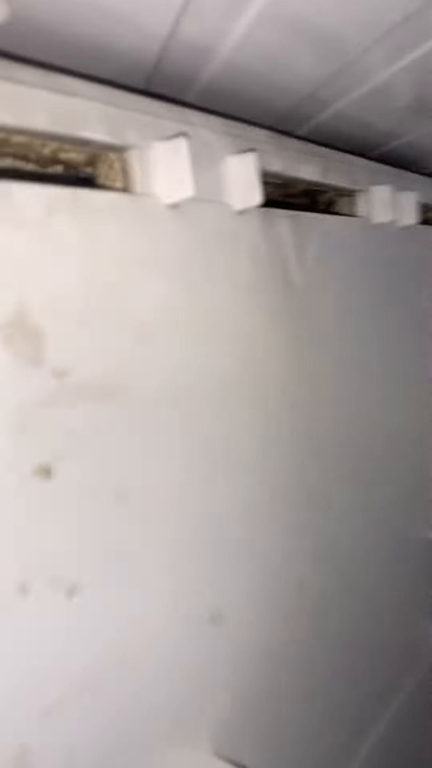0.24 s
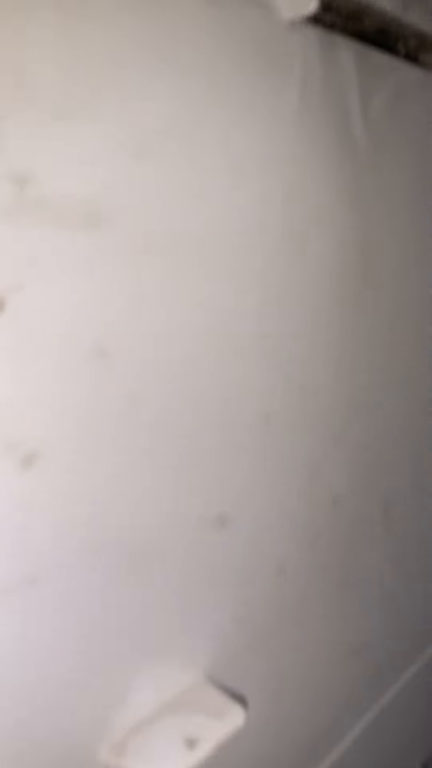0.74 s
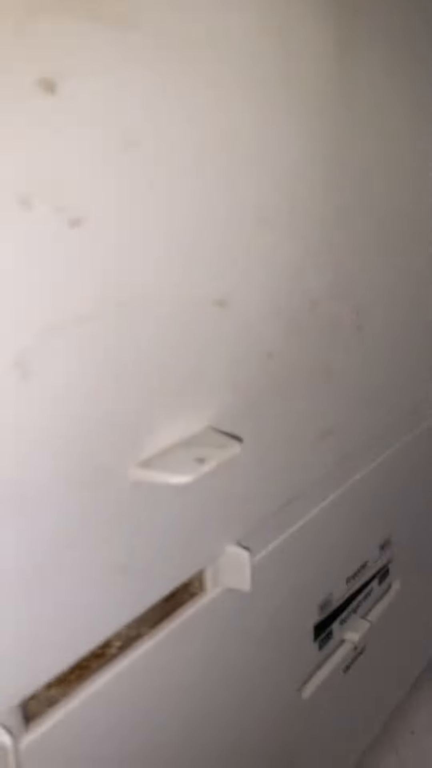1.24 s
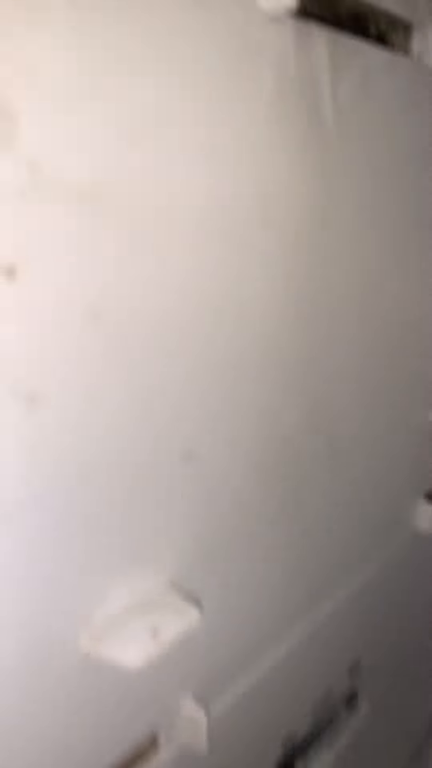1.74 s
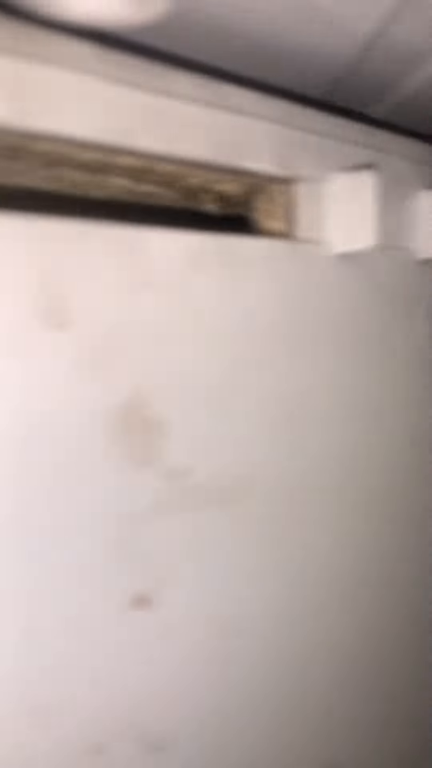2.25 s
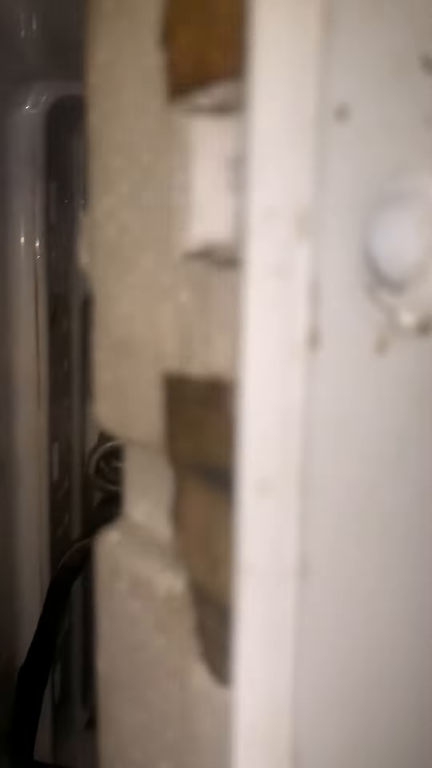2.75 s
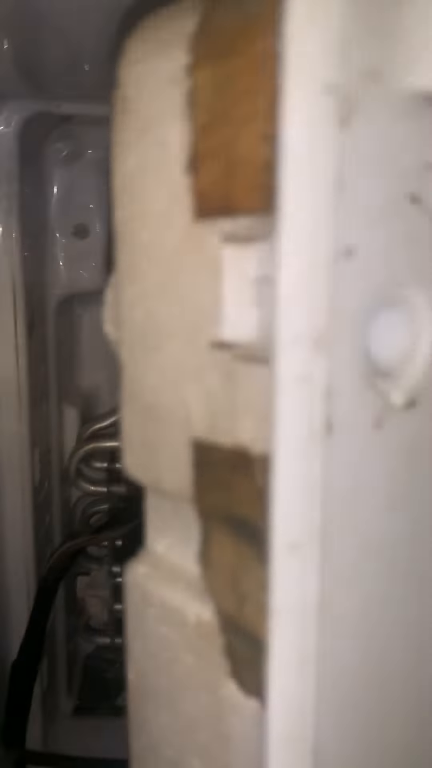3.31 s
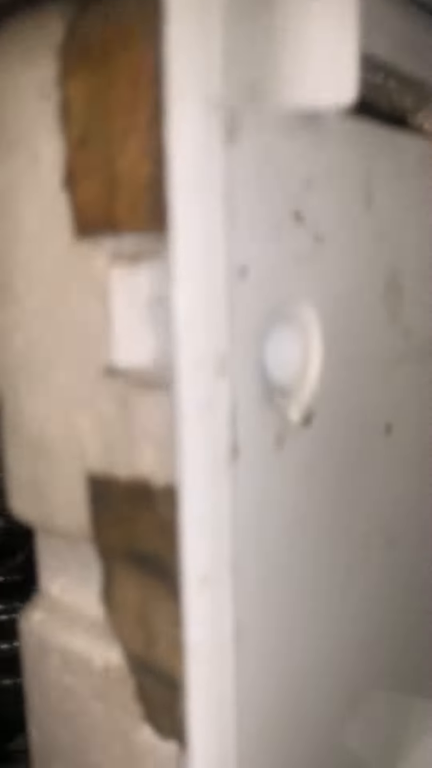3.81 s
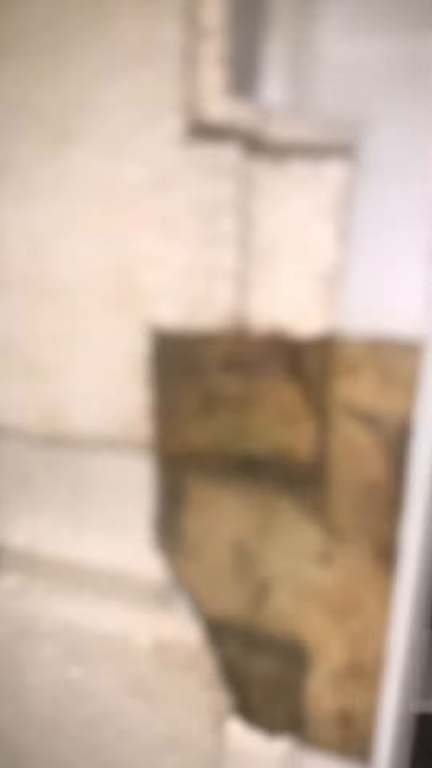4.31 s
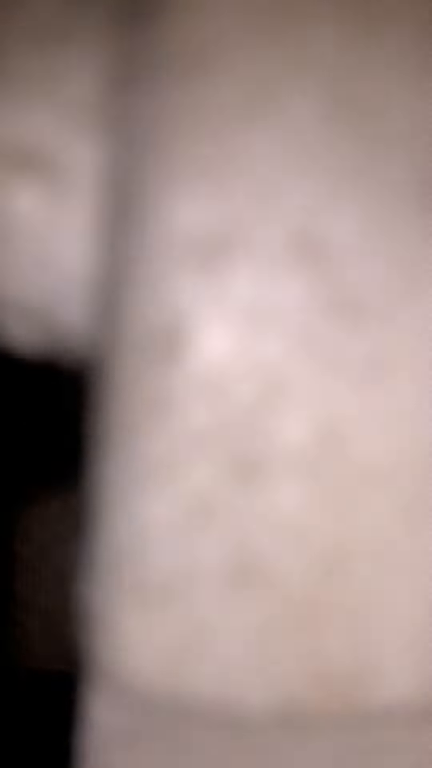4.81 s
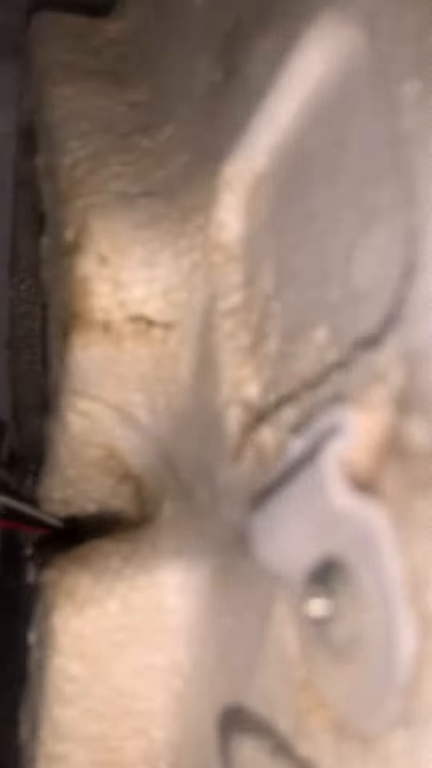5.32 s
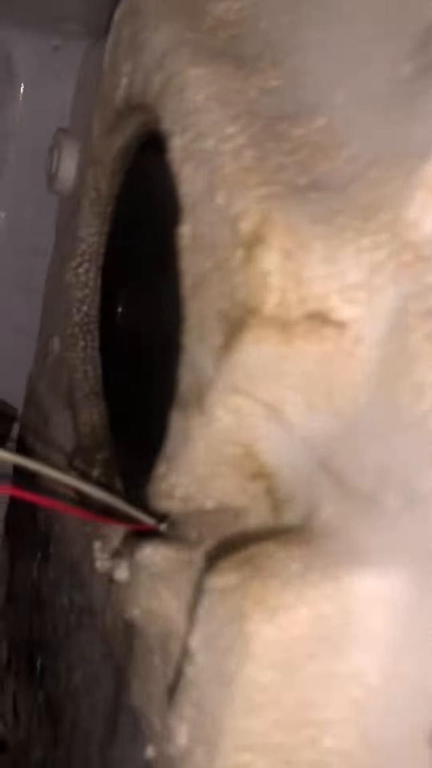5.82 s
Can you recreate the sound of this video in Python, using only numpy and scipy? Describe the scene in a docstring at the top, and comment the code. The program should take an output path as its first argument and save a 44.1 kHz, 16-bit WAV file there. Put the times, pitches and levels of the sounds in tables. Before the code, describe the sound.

Inside a running fridge, low humming and stirred air accompany dull plastic thumps and finger ticks before the fan's drone swells up close.

```python
"""Inside a running refrigerator's freezer

A hand-held phone hears it from the empty compartment: shaft harmonics hum, shaped noise is the stirred air.
Knocks ring modes of the plastic liner; fingers slide and tick on the phone's case, which creaks in the hand.
Near the end the phone moves behind the back panel, up to the fan opening, where the drone is louder."""
import sys
import numpy as np
from scipy import signal
from scipy.fft import rfft, irfft, next_fast_len
from scipy.io import wavfile
from scipy.ndimage import uniform_filter1d, map_coordinates

SR = 44100
rng = np.random.default_rng(int(sys.argv[2]) if len(sys.argv) > 2 else 0)


def log_audio(samples):
    """Write samples as a 16-bit WAV file to the path given in sys.argv[1]."""
    # one column per channel
    frames = np.atleast_2d(samples).T
    # limit to full scale, then quantise
    limited = np.clip(frames, -1, 1)
    pcm = np.round(limited * 32767).astype(np.int16)
    wavfile.write(sys.argv[1], SR, pcm)


N = 267334
T = np.arange(N) / SR

MOTOR_HZ = 55.66  # mean shaft rate
BLADES = 3
# Motor tones. Each row: multiple of the shaft rate (rounded for pitch), level in the compartment in dB,
# left minus right there in dB at the path's strongest lean, right lag there in rad, level at the fan in dB.
MOTOR_TONES = [(1.99, -52, 18, -0.5, -38.5), (2.94, -46, 16.5, 0.5, -49.5), (4.02, -71, 12, -1.5, -61.5),
               (4.94, -53, 20, 2.5, -63), (6.26, -52, 13.5, -1.24, -61.5), (12, -92, -6, 5, -76.5),
               (15.47, -58.5, -16, 1.6, -60), (17.8, -63, 7.5, 1.9, -70.5), (20.7, -66.5, 20, -1, -82),
               (26.8, -72.5, -16, 1.5, -73.5)]
# The phone's path. Each row: time in seconds, gain of the fan's sound in dB,
# left minus right in the standing wave in dB, strength of that wave in dB.
PHONE_PATH = [(0, -14, -1.5, 13), (.4, -58, 8, -3.5), (1, -27, 24, -0.5), (1.5, -29.5, 18.5, 2),
              (2.1, -58, 10.5, -1), (2.45, -34, 8.5, -2.5), (2.8, -37, 26, -1.5), (3.7, -20, 14, -2),
              (4.05, -23, 34, -7.5), (4.25, -18, -3, -14), (4.72, -13, 25, 1.5), (4.85, -0.5, 4, 6),
              (5.1, 0.5, 4, -18), (6.06, 3.5, 15, -3)]
BOOM_REFERENCE_DB = -38.5  # the fan gain that leaves the compartment's boom level unchanged
BOOM_FALL = 0.052  # dB the compartment's boom loses per dB gained by the fan
BOOM_SHADE, RUSH_SHADE = 1, 3.2  # exponents: how steeply the back panel shuts out boom and rush
# Brief level changes shared by rush, draught, gap air, grumble (falls only) and, most fully, upper hum.
# Each row: time in seconds, half length in seconds, change in dB.
LEVEL_CHANGES = [(1.166, 0.029, -4), (3.247, 0.029, -14), (4.14, 0.029, -11.5), (4.197, 0.021, -10.5),
                 (4.238, 0.014, -5), (4.32, 0.017, -0.5), (4.395, .016, 0), (4.47, 0.013, -7),
                 (4.571, 0.013, -3), (4.655, 0.017, 3), (4.68, 0.011, -2.5), (4.7, 0.012, 6),
                 (4.727, 0.011, -4), (4.76, 0.0086, 4), (4.848, 0.0082, 6), (4.859, 0.014, -9),
                 (5.03, 0.016, 2.5), (5.15, 0.014, -3)]

# Draught at the fan opening, common to both microphones. Each row: frequency in Hz, level in dB.
FAN_MID_COLOUR = [(25, -34), (55, -6.5), (85, -3), (108, 3.5), (130, -5.5), (190, -17.5), (290, -19),
                  (350, -16), (530, -23.5), (620, -21), (720, -24.5), (860, -23), (1040, -31.5),
                  (1750, -41), (2500, -47.5), (4000, -51), (4600, -73.5)]
# The same, opposed between the microphones. Each row: frequency in Hz, level in dB.
FAN_SIDE_COLOUR = [(100, -39.5), (350, -38.5), (480, -22.5), (610, -8), (700, 4.5), (850, 15), (980, 16),
                   (1300, 4), (1800, -1), (2300, 0.5), (2600, -3.5), (3600, -12), (4600, -16.5),
                   (7000, -44)]
FAN_MID_DB, FAN_SIDE_DB = -36, -50.5
# Hollow resonances in the fan duct. Each row: frequency in Hz, width in Hz, level in dB.
DUCT_RESONANCES = [(468, 36, -70), (627, 41, -57), (826, 75, -53.5), (1197, 40, -64.5), (1437, 69, -73.5),
                   (1760, 140, -67.5)]
# Resonances of the gap beside the back panel. Each row: frequency in Hz, width in Hz, level in dB.
GAP_RESONANCES = [(396, 31, -60.5), (603, 50, -77), (839, 17, -59), (985, 56, -56.5), (1140, 40, -70.5),
                  (1700, 130, -83)]
GAP_S, GAP_HALF_S = 4.46, 0.41  # when the phone passes the gap, and half the time that takes
# Compartment air, common to both microphones. Each row: frequency in Hz, level in dB.
AIR_MID_COLOUR = [(25, -32), (45, -10.5), (85, -8), (110, 4.5), (135, -1.5), (165, -3.5), (200, -8),
                  (270, -2.5), (305, -12.5), (390, -21), (670, -33), (790, -20.5), (1150, -15.5),
                  (1350, -20.5), (1680, -22), (2150, -28), (2600, -35), (3900, -71)]
# The same, opposed between the microphones. Each row: frequency in Hz, level in dB.
AIR_SIDE_COLOUR = [(30, -21.5), (100, -6), (145, 1), (210, -8), (275, 5.5), (320, -2.5), (400, -8),
                   (550, -10.5), (900, -13), (1300, -30), (2100, -42), (3500, -31.5), (6000, -94)]
AIR_MID_DB, AIR_SIDE_DB = -40.5, -42

# Knocks on the liner. Each row: start in seconds, thump level in dB, thump frequency in Hz, thump t60 in
# seconds, panel ring level in dB (before a doubling), clack level in dB, low-pass corner in Hz.
LINER_KNOCKS = [(0.002, -21.5, 114.6, 0.18, -25.5, -31.5, 2030),
                (0.085, -18.5, 111.8, 0.35, -19.5, -32, 2200), (0.161, -28, 125, 0.38, -16, -31, 1500),
                (0.168, -19.5, 109.6, 0.36, -30, -27, 7000), (0.576, -11.5, 122.2, 0.1, -24, -54, 1200),
                (0.767, -11, 131, 0.15, -24, -43, 5000), (1.225, -23, 120, 0.18, -28.5, -33, 2500),
                (1.750, -33, 127, 0.17, -30.5, -33, 3000), (1.914, -40, 130, 0.12, -56, -33.5, 2500),
                (2.253, -35, 70, 0.12, -40, -55, 900), (2.722, -25, 124, 0.15, -33, -34.5, 3000),
                (3.444, -26.5, 122.3, 0.19, -31.5, -32.5, 2940), (3.936, -23, 140.4, 0.15, -26, -38, 4000),
                (4.410, -20.5, 99, 0.12, -32.5, -55, 900), (4.526, -41, 100, 0.081, -40, -43.5, 3000),
                (4.603, -26, 94.7, 0.17, -34, -67, 900), (4.813, -16, 101, 0.17, -30.5, -61, 500),
                (5.003, -49, 109, .15, -23.5, -62, 704)]
# Liner modes. Each row: nominal frequency in Hz, t60 in seconds, nominal level in dB,
# signed gain at the right microphone (left is 1).
LINER_MODES = [(220.5, 0.093, -4.5, 1), (346.4, 0.1, -5, 0.8), (432, 0.14, -7, 0.53), (464, 0.2, -5, 0),
               (500, 0.079, -26, -1.9), (649, 0.07, 3, -0.76), (734, 0.024, -3.5, -0.55),
               (808, 0.066, -5, -0.23), (1230, 0.045, -22, 0.44), (2240, 0.063, -17, 1)]
# Spectrum of clack and scuff. Each row: frequency in Hz, level in dB.
CLACK_COLOUR = [(300, -1), (550, 15), (800, -3.5), (1300, 12.5), (2500, 6.5), (4000, -11), (7000, -24),
                (10000, -67)]
# Hand scuffs on the liner. Each row: middle in seconds, half length in seconds, level in dB.
HAND_SCUFFS = [(0.088, 0.028, -45.5), (0.169, 0.011, -38), (.585, 0.011, -60), (0.765, 0.021, -37),
               (3.941, 0.017, -44)]

# Fingers sliding on the case. Each row: time at the fastest in seconds, time to speed up in seconds,
# time to slow down in seconds, level in dB.
FINGER_SLIDES = [(.03, 0.3, 0.086, -55), (.28, 0.44, 0.087, -62), (.7, 0.048, 0.11, -64),
                 (1.05, 0.17, 0.3, -66), (1.98, 0.29, 0.9, -56.5), (2.43, 0.098, 0.11, -49.5),
                 (2.73, 0.031, 0.033, -44), (2.982, 0.04, 0.041, -47), (3.26, 0.046, 0.082, -63.5),
                 (3.63, 0.18, 0.13, -60.5), (3.9, 0.052, 0.047, -45), (4.422, 0.032, 0.024, -62),
                 (4.828, 0.016, 0.018, -60.5), (5.06, 0.024, 0.092, -59), (5.7, 0.044, 0.19, -69)]
REST_DB, STROKE_SHAPE = -72.5, 1.3  # resting fingers; exponent of a slide's rise and fall
# Spectrum of the rubbing. Each row: frequency in Hz, level in dB.
SKIN_COLOUR = [(1500, -12.5), (3000, 3.5), (4000, 9), (5000, 1.5), (6500, 2.5), (9000, -2.5), (12000, 2),
               (15500, 5.5)]
# Ticks of the case under the fingers. Each row: start in seconds, relative level in dB.
FINGER_TICKS = [(0.764, -64), (1.9056, -52), (2.0697, -65), (2.086, -55), (2.702, -51), (3.0763, -58),
                (3.671, -50.5), (5.034, -50), (5.381, -56), (5.508, -60), (5.526, -63.5), (5.7852, -62),
                (5.878, -54.5)]
PORT_LAG_SAMPLES = 9.7  # case vibration, first microphone to second

# Pressure of the hand's grip. Each row: time in seconds, level of the case's grumble in dB.
GRIP_PRESSURE = [(0, -63), (2.05, -63), (2.4, -48.5), (3.6, -56), (4.2, -39), (4.42, -42), (4.8, -42),
                 (5.1, -87), (6.06, -101.5)]
# Spectrum of grumble and flex. Each row: frequency in Hz, level in dB.
FLEX_COLOUR = [(50, 5), (100, 7), (160, -1.5), (300, 1.5), (500, 6.5), (900, 2.5), (1400, -15),
               (2800, -22.5), (5000, -38)]
# Creaks of the case. Each row: start in seconds, hollow flex level in dB, dry crack level in dB.
CASE_CREAKS = [(.066, -41, -58), (.078, -44, -49), (.147, -42.5, -49), (1.169, -42, -66), (1.412, -46, -64),
               (2.015, -42, -66), (2.386, -37, -43), (2.420, -42, -50), (2.554, -50, -51),
               (3.014, -38, -44), (3.227, -44, -50), (3.247, -40, -48), (3.444, -40, -59),
               (3.452, -40, -68), (3.467, -45, -66), (3.671, -43, -56), (3.849, -39, -59),
               (3.935, -36, -60), (3.961, -45, -67), (4.080, -46, -54), (4.15, -38, -60), (4.224, -40, -59),
               (4.383, -36, -53), (4.410, -48, -65), (4.526, -54, -57), (4.606, -41, -68),
               (4.619, -53, -68), (4.759, -39, -54), (4.799, -42, -54), (4.842, -38, -58),
               (5.014, -62, -48), (5.164, -61, -49), (5.326, -70, -51), (5.378, -67, -48),
               (5.524, -73, -50), (5.694, -76, -51)]
# Spectrum of the dry cracks. Each row: frequency in Hz, level in dB.
DRY_COLOUR = [(700, -8.5), (1500, 8), (2500, -2), (4000, -13), (7000, -43)]
TOP_HZ = 15900


def undb(db):
    """Decibels to gain."""
    return 10 ** (np.asarray(db) / 20)


def unit(x):
    """Scale to rms 1."""
    return x / np.sqrt(np.mean(x ** 2))


def curves(table):
    """Each column of a table, joined by straight lines in time."""
    s, *columns = np.transpose(table)
    return [np.interp(T, s, c) for c in columns]


def colour(x, points):
    """Filter by a spectrum of (Hz, dB) points, falling away beyond its ends."""
    hz, db = np.transpose(points)
    size = next_fast_len(N)
    f = np.maximum(np.fft.rfftfreq(size, 1 / SR), 1)
    ends = np.minimum(f / hz[0], 1) ** 2 * np.minimum(hz[-1] / f, 1) ** 2
    gain = ends * undb(np.interp(np.log(f), np.log(hz), db))
    return irfft(rfft(x, size) * gain, size)[..., :N]


def noise(points):
    """Noise of rms 1 with the given spectrum."""
    return unit(colour(rng.standard_normal(N), points))


def walk(rate_hz):
    """Random drift with a spread near 1: steps at rate_hz, smoothed twice."""
    k = int(SR / rate_hz)
    steps = np.repeat(rng.standard_normal(N // k + 1), k)
    return 1.3 * uniform_filter1d(uniform_filter1d(steps, k), k)[:N]


def swell(s, rise_s, fall_s, shape=2):
    """A smooth rise to 1 at time s and a fall after it."""
    return np.exp(-np.abs((T - s) / np.where(T < s, rise_s, fall_s)) ** shape)


def fade(t, t60):
    """Exponential ring-down, 60 dB in t60 seconds."""
    return np.exp(-np.log(1000) * t / t60)


def add(out, s, sound):
    """Mix a short sound in at time s."""
    i = max(int(s * SR), 0)
    out[..., i:i + sound.shape[-1]] += sound[..., :N - i]


def burst(source, s, t60, attack_s=.001):
    """A dying snatch of noise from time s, with rms 1 over its first 5 ms."""
    t = T[:SR // 10]
    snatch = np.roll(source, -int(s * SR))[:len(t)]
    sound = snatch * fade(t, t60) * (1 - np.exp(-t / attack_s))
    return sound / np.sqrt(np.mean(sound[:SR // 200] ** 2))


def stereo(mid, side):
    """Left and right from their common and opposed parts."""
    return np.array([mid + side, mid - side])


def boxed(x, t60, share, apart=1):
    """Dense echoes between close walls leave fine peaks and dips above the bass, which shift with time."""
    t = T[:SR // 12]
    places = np.array([walk(3.055) for _ in range(4)])
    echoes = 0
    for nearness in places / np.sqrt(np.sum(places ** 2, axis=0)):
        common, opposed = rng.standard_normal((2, len(t))) * fade(t, t60)
        walls = stereo(common, apart * opposed)
        walls = walls / np.sqrt(np.sum(walls ** 2, axis=1, keepdims=True))
        echoes = echoes + nearness * signal.oaconvolve(x, walls, axes=1)[:, :N]
    return x + colour(share * echoes - 0.35 * x, [(500, -49.0), (1100, 0.5), (2000, 0.5), (16000, 23.5)])


def roam(x, depth_db, rate_hz=11):
    """A moving microphone crosses nodes, so neighbouring bands swell and sink on their own."""
    out = x
    for hz in np.geomspace(320, 1600, num=7):
        skirts = [(hz / 1.35, -30), (hz / 1.15, -5), (hz, 0), (hz * 1.15, -5), (hz * 1.35, -30)]
        band = colour(x, skirts)
        # the last term offsets the mean power the swelling adds
        out = out + band * (undb(depth_db * walk(rate_hz) - depth_db ** 2 / 10) - 1)
    return out


def resonances(modes, opposed, flutter_db=6):
    """Turbulent air sounds narrow resonances; each swells and fades on its own."""
    out = 0
    for hz, width, db in modes:
        peak = [(hz - 2 * width, -30), (hz - width / 2, -3), (hz, 0),
                (hz + width / 2, -3), (hz + 2 * width, -30), (hz + 4 * width, -55)]
        flutter = unit(undb(flutter_db * np.tanh(walk(35))))
        out = out + undb(db) * flutter * stereo(noise(peak), opposed * noise(peak))
    return out


def hum(turn, inside, at_fan, pan_db, change, waver_db=2.17, waver_rad=0.054, flutter_rad=0.034):
    """Harmonics of the shaft; the higher, the more they waver, flutter and, inside, share the level changes."""
    out, offside = 0, pan_db / pan_db.max()
    for k, inside_db, lean_db, lag_rad, fan_db in MOTOR_TONES:
        jitter = k * (waver_rad * walk(6) + flutter_rad * walk(30))
        phase = 2 * np.pi * round(k) * turn + rng.uniform(0, 2 * np.pi) + jitter
        waver = undb(waver_db * (k / 4) ** 0.7 * walk(11))
        lean = undb(offside * lean_db / 2)
        pair = np.array([lean * np.sin(phase), np.sin(phase - lag_rad) / lean])
        far = undb(inside_db) * inside * change ** min(k / 12, 1) * pair
        near = undb(fan_db) * at_fan * np.sin(phase)
        out = out + np.sqrt(2) * unit(waver) * (far + near)
    return out


def draught(turn, chop=0.14, flicker_db=0.5, patchy_db=2):
    """Turbulence at the fan opening: coloured noise, its upper part throbbing as the blades pass."""
    mid, side = undb(FAN_MID_DB) * noise(FAN_MID_COLOUR), undb(FAN_SIDE_DB) * noise(FAN_SIDE_COLOUR)
    air = stereo(mid, side) * undb(flicker_db * walk(14))
    blades = np.sin(2 * np.pi * BLADES * turn)
    air = roam(air, patchy_db)
    throb = chop * blades * colour(air, [(400, -3), (800, 9.0), (8000, 15.0)])
    return boxed(air + throb, t60=0.043, share=0.34, apart=0.12)


def duct(at_fan):
    """The draught sounds hollow resonances in the fan duct."""
    return at_fan * resonances(DUCT_RESONANCES, opposed=0.11)


def gap(change):
    """Air sounds the gap beside the back panel while the phone passes it."""
    return change * swell(GAP_S, GAP_HALF_S, GAP_HALF_S, 4) * resonances(GAP_RESONANCES, opposed=0.4)


def compartment(turn, pan_db, wave_db, boom, opening,
                chop=0.071, flicker_db=1, patchy_db=1.5, stutter_db=7, lumpy_db=6):
    """Stirred air booms in the box, its rush pulsing with the blades; a standing wave leans to one side."""
    mid, side = undb(AIR_MID_DB) * noise(AIR_MID_COLOUR), undb(AIR_SIDE_DB) * noise(AIR_SIDE_COLOUR)
    air = roam(stereo(mid, side) * undb(flicker_db * walk(15)), patchy_db)
    rush = colour(air, [(300, -30), (480, 0), (20000, 0)])
    wave = colour(air, [(90, -29.5), (170, -26.0), (265, 3.5), (310, -3.5), (400, -22.0)])
    # one microphone lies near a node of the wave
    lean = undb(np.array([pan_db, -pan_db]) / 2)
    lean = undb(wave_db) * lean / np.sqrt(np.mean(lean ** 2, axis=0))
    blades = np.sin(2 * np.pi * BLADES * turn)
    # the rush stutters and breaks into patches while the phone passes the gap beside the panel
    passing = swell(GAP_S, GAP_HALF_S, GAP_HALF_S, 4.8)
    stutter = undb(stutter_db * passing * np.minimum(walk(35), .5))
    lumpy = rush + passing * (roam(rush, lumpy_db, rate_hz=22) - rush)
    booming = boom * (air - rush + wave * (lean - 1))
    echoing = boxed(lumpy, t60=0.045, share=0.56, apart=0.9)
    return booming + opening * stutter * (1 + chop * blades) * echoing


def ring(modes, t):
    """Decaying modes at both microphones, peak 1; every blow varies their pitch and level."""
    out = 0
    for hz, t60, db, right in modes:
        detune, size = rng.standard_normal(2)
        tone = np.sin(2 * np.pi * hz * (1 + .025 * detune) * t)
        out = out + np.outer([1, right], undb(db + 2.5 * size) * tone * fade(t, t60))
    return out / np.abs(out).max()


def liner_grit(rattle_db=3):
    """Rattling, boxed-in noise of contact with the liner, from which clacks and scuffs are cut."""
    grit = stereo(noise(CLACK_COLOUR), 0.68 * noise(CLACK_COLOUR)) / 2
    return boxed(grit, t60=0.011, share=0.43) * unit(undb(rattle_db * walk(350)))


def knocks(grit, swell_s=0.017, contact_s=0.0022, clack_t60=0.085):
    """Each knock rattles, rings the plastic panel and sets the box booming a moment later."""
    out, t = np.zeros((2, N)), T[:SR // 2]
    contact = 1 - np.exp(-t / contact_s)
    for s, thump_db, thump_hz, thump_t60, panel_db, clack_db, dull_hz in LINER_KNOCKS:
        clack = np.roll(grit, -int(s * SR), axis=1)[:, :len(t)] * fade(t, clack_t60)
        thump = np.sin(2 * np.pi * thump_hz * t) * fade(t, thump_t60) * (1 - np.exp(-t / swell_s))
        blow = contact * (2 * undb(panel_db) * ring(LINER_MODES, t) + undb(clack_db) * clack)
        dulled = signal.sosfilt(signal.butter(2, dull_hz, fs=SR, output="sos"), blow)
        add(out, s, undb(thump_db) * thump + dulled)
    return out


def scuffs(grit, catch_db=5):
    """The hand scuffs the liner: swells of grit that catch unevenly."""
    scuffing = sum(undb(db) * swell(s, half, half) for s, half, db in HAND_SCUFFS)
    return grit * scuffing * unit(undb(catch_db * walk(160)))


def slides(grain_db=1.63):
    """Skin hisses on the case: grainy noise that rises and falls with each stroke."""
    strokes = [undb(db) * swell(s, rise, fall, STROKE_SHAPE) for s, rise, fall, db in FINGER_SLIDES]
    power = undb(REST_DB) ** 2 + sum(stroke ** 2 for stroke in strokes)
    return noise(SKIN_COLOUR) * np.sqrt(power) * undb(grain_db * walk(300))


def ticks(tick_db=13, chatter_db=-17, snap_t60=0.013, tail_db=-37, tail_t60=0.18):
    """The case ticks under the fingers: an impulse, a snap of noise and a faint tail."""
    t, out = T[:SR // 10], np.zeros(N)
    for s, db in FINGER_TICKS:
        decay = undb(chatter_db) * fade(t, snap_t60) + undb(tail_db) * fade(t, tail_t60)
        chatter = rng.standard_normal(len(t)) * decay
        add(out, s, undb(db + tick_db) * (signal.unit_impulse(len(t)) + chatter))
    return colour(out, [(1500, 2.7), (3000, 14.2), (8000, 10.5), (15000, 8.6)])


def fingers():
    """Slides and ticks shake the case; the vibration reaches the second microphone later and inverted."""
    case = slides() + ticks()
    late = map_coordinates(case, [np.arange(N) - PORT_LAG_SAMPLES], order=5)
    return np.array([case, -late])


def grip(change, rough_db=5.5, flex_t60=0.037, crack_t60=0.014):
    """The case grumbles and creaks in the hand; flexing it pushes the two microphones in opposite senses."""
    level_db, = curves(GRIP_PRESSURE)
    hollow, crack = noise(FLEX_COLOUR), noise(DRY_COLOUR)
    flex = np.minimum(change, 1) * undb(level_db) * unit(undb(rough_db * walk(90))) * hollow
    for s, flex_db, crack_db in CASE_CREAKS:
        add(flex, s, undb(flex_db) * burst(hollow, s, flex_t60) + undb(crack_db) * burst(crack, s, crack_t60))
    return np.array([flex, -flex])


def scene():
    """The motor drives hum and air; nearing the fan, the panel shuts out the compartment; the hand adds noises."""
    fan_db, pan_db, wave_db = curves(PHONE_PATH)
    at_fan = undb(fan_db)
    exposed = np.clip(1 - at_fan, .01, 1)
    inside = exposed ** BOOM_SHADE * undb(BOOM_FALL * (BOOM_REFERENCE_DB - fan_db))
    change = undb(sum(db * swell(s, half, half) for s, half, db in LEVEL_CHANGES))
    # shaft angle in turns, its speed drifting slightly
    turn = np.cumsum(MOTOR_HZ * (1 + 0.00052 * walk(1.947))) / SR
    fan = change * at_fan * draught(turn) + duct(at_fan)
    air = compartment(turn, pan_db, wave_db, inside, change * exposed ** RUSH_SHADE) + gap(change)
    grit = liner_grit()
    hand = knocks(grit) + scuffs(grit) + fingers() + grip(change)
    return hum(turn, inside, at_fan, pan_db, change) + fan + air + hand


def record(dry):
    """The phone cuts the top: a steep low-pass at TOP_HZ."""
    return signal.sosfilt(signal.ellip(10, .2, 70, TOP_HZ, fs=SR, output="sos"), dry)


dry = scene()
out = record(dry)
log_audio(out)
```